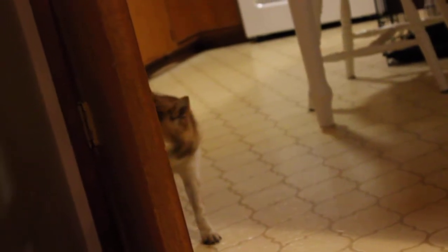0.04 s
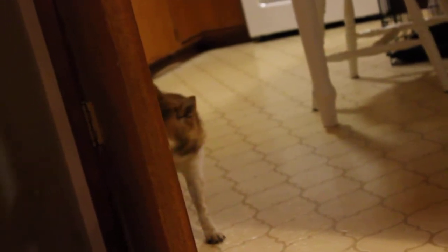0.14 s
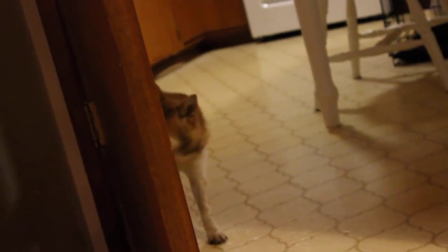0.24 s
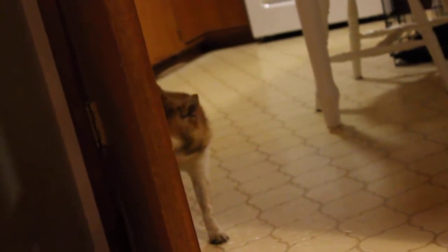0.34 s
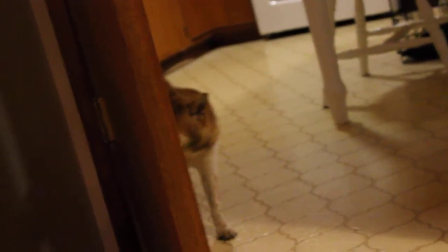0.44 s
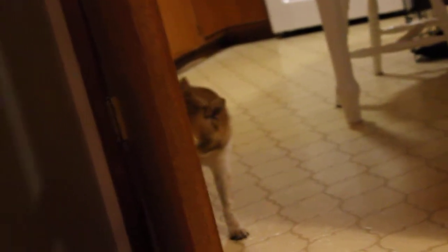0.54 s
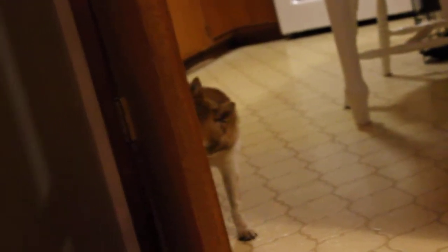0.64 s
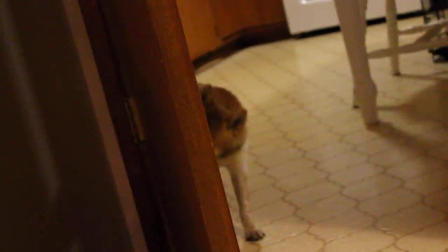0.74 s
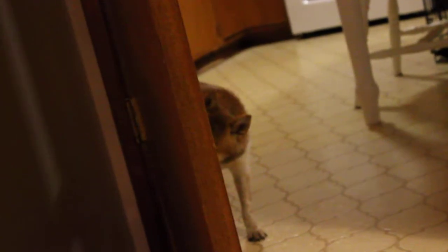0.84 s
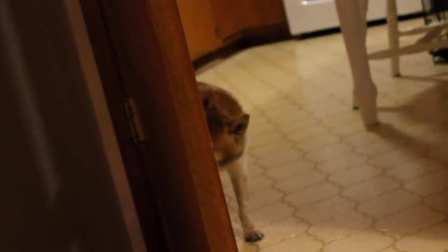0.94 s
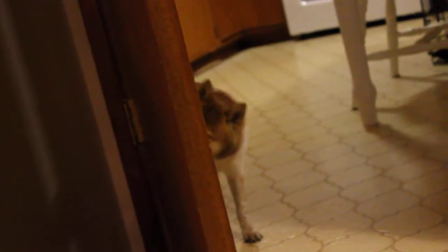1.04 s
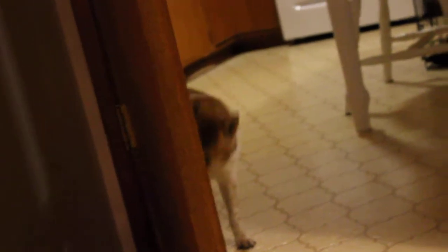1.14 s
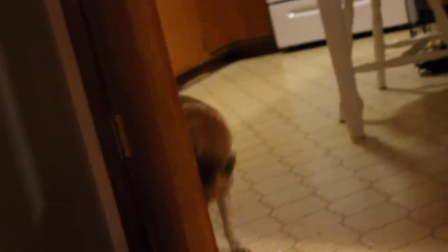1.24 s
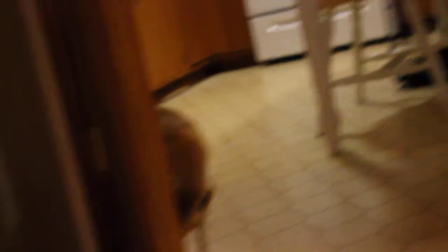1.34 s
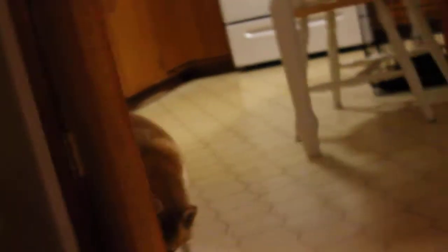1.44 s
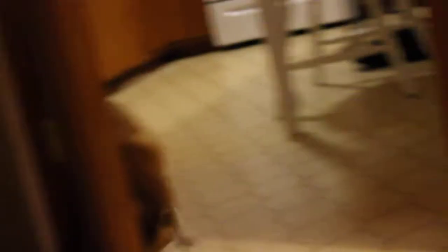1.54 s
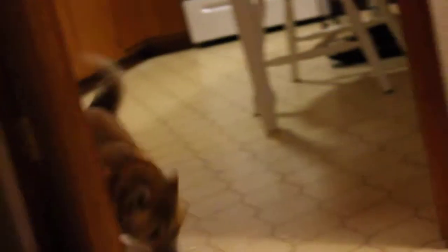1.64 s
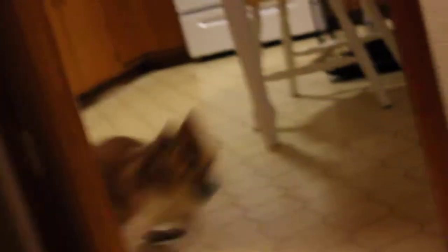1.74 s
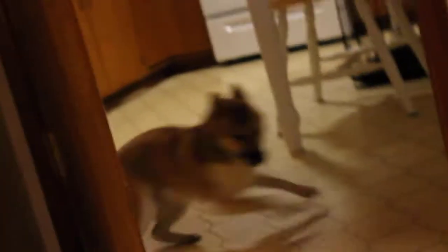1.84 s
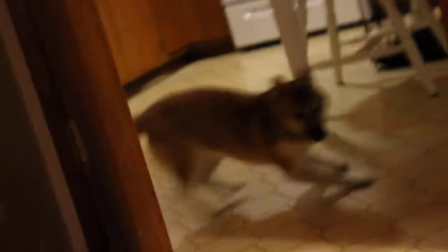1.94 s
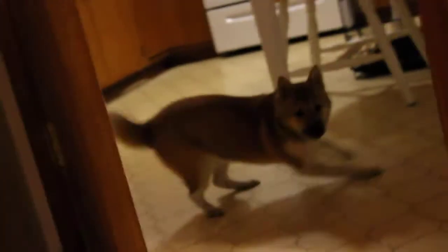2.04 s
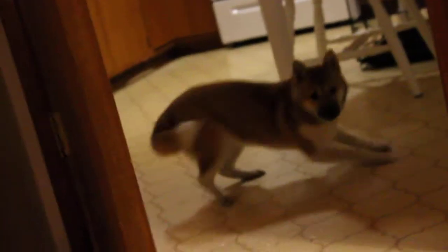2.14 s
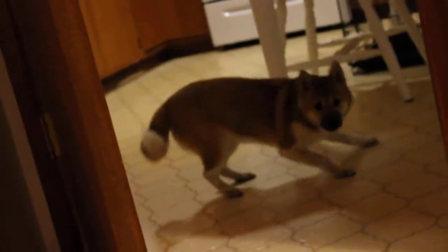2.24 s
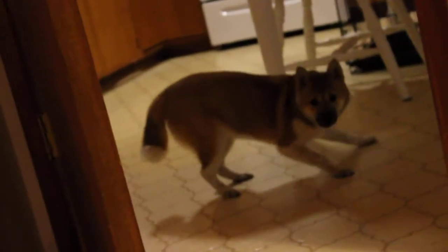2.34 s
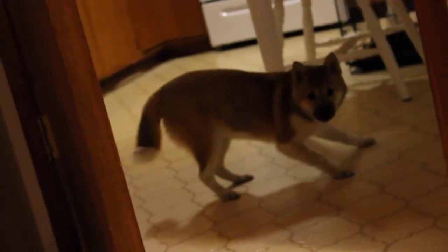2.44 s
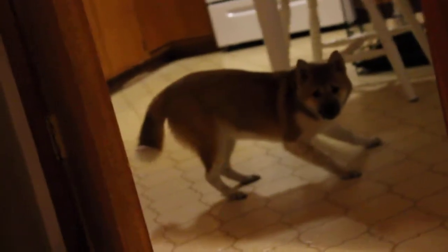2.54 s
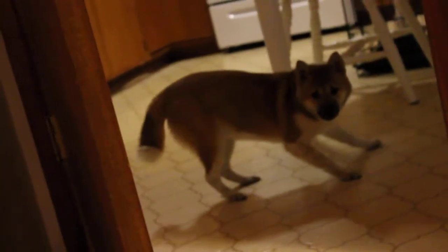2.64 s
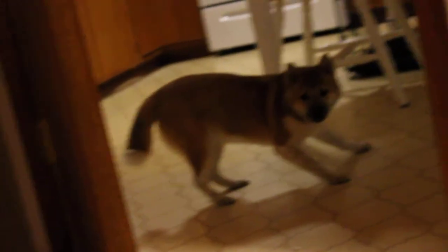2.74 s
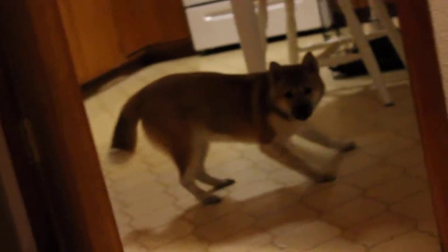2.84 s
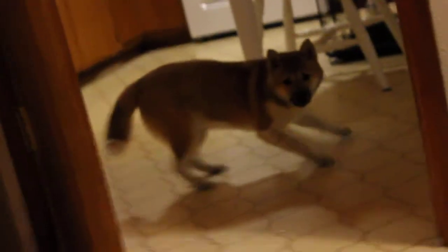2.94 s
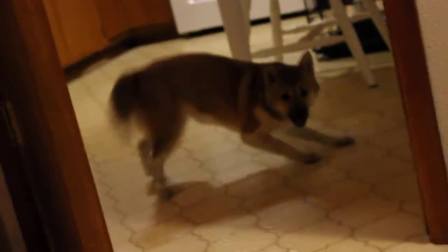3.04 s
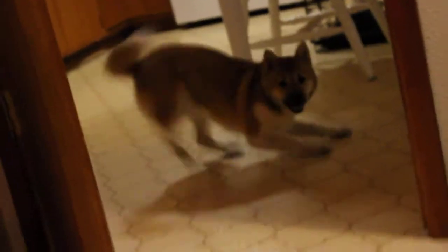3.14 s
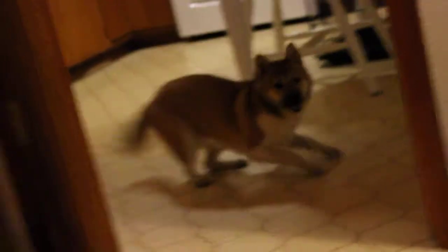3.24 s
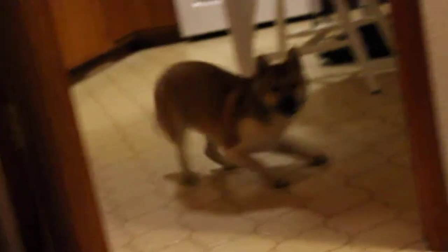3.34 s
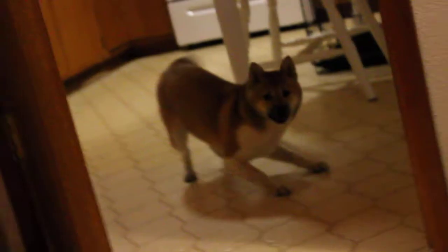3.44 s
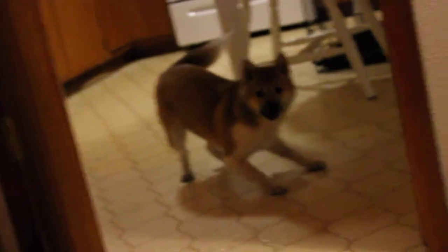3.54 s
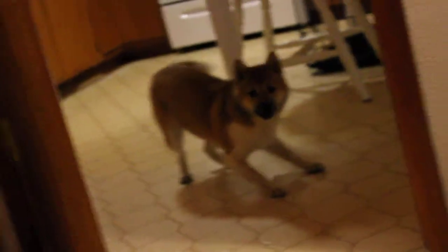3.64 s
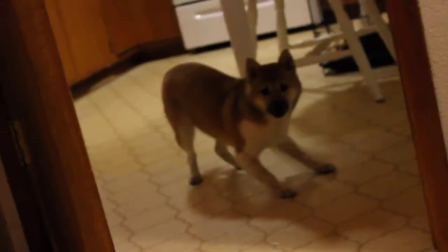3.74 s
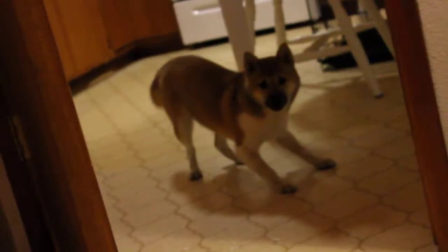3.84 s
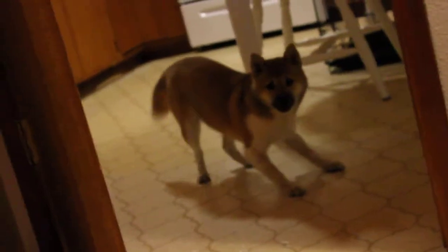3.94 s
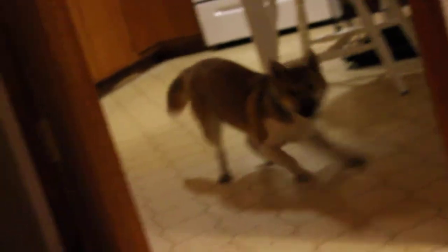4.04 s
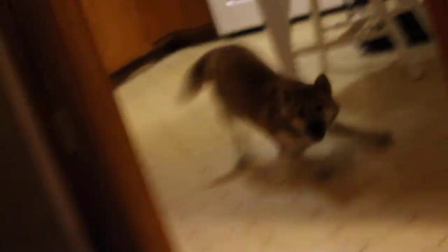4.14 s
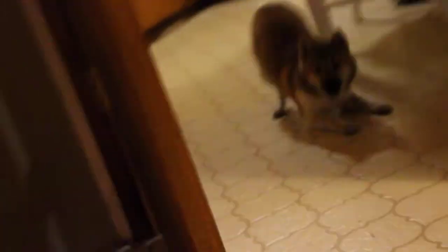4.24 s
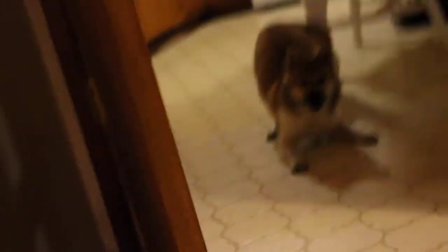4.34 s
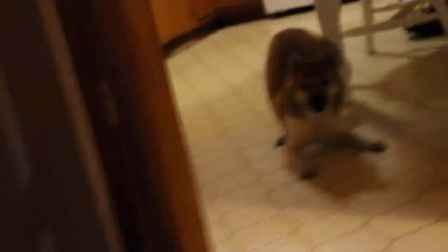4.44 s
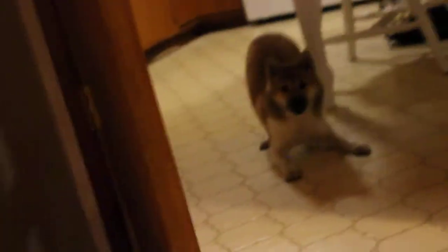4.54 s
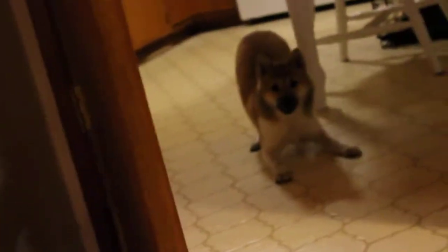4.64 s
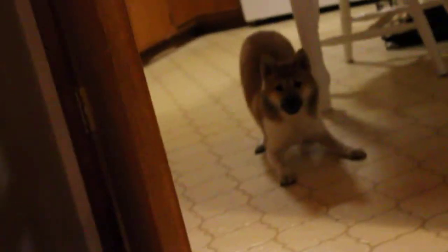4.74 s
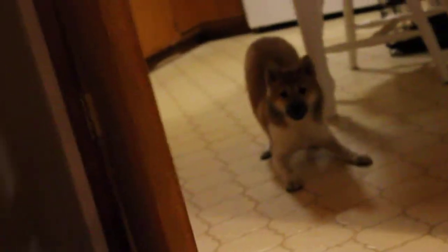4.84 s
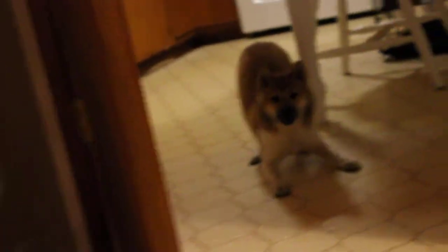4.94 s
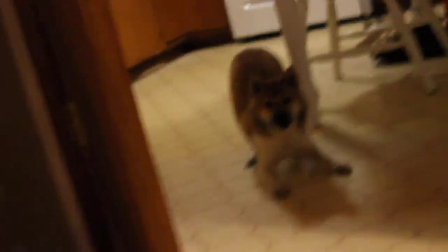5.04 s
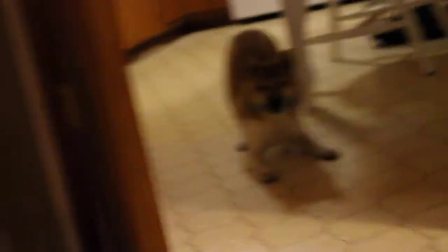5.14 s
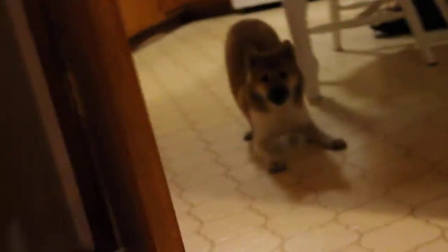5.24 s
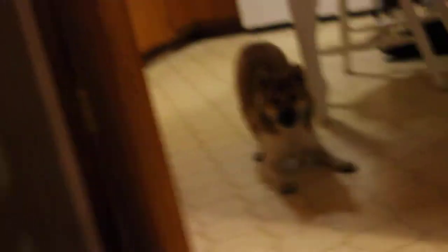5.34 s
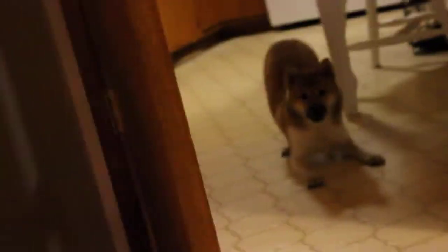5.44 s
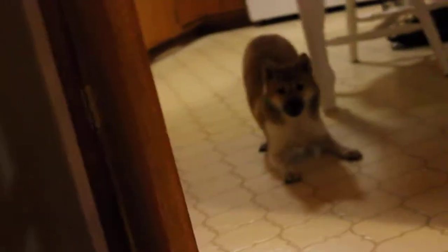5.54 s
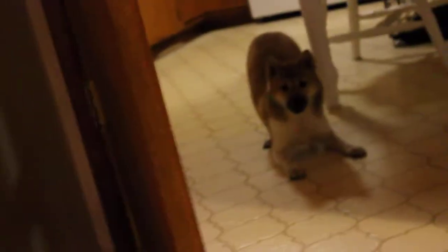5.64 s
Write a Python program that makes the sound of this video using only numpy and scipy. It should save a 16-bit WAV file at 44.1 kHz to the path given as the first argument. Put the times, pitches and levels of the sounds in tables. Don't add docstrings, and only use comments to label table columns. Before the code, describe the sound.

A small dog's claws click and scrabble in sudden bursts on a hard kitchen floor, with skids, soft thumps and a brief metallic rattle.

```python
import sys
import numpy as np
from scipy import signal
from scipy.fft import rfft, irfft, next_fast_len
from scipy.io import wavfile
from scipy.ndimage import uniform_filter1d, map_coordinates

SR = 44100
rng = np.random.default_rng(int(sys.argv[2]) if len(sys.argv) > 2 else 0)


def voltage_ratio(level):
    return 10 ** (np.asarray(level, float) / 20)


def transcribe(signal):
    frames = np.atleast_2d(signal).T
    limited = np.clip(frames, -1, 1)
    pcm = np.round(limited * 32767).astype(np.int16)
    wavfile.write(sys.argv[1], SR, pcm)


N = 250467


def claws():
    life_cycles, edge_ms = 0.56, 0.4
    low_hz, edge_hz, dull_hz = 1700, 7000, 11000
    s, db, hz, tip_db = nails()[:, :, None]
    length = 90
    t = np.arange(length) / SR

    life = life_cycles * np.exp(0.092 * rng.standard_normal((len(s), 1))) / hz
    snap = np.sin(2 * np.pi * hz * t) * (1 - np.exp(-t / life / 0.26)) * np.exp(-t / life)
    snap = voltage_ratio(db) * snap / np.abs(snap).max(axis=1, keepdims=True)

    spit = rng.standard_normal((len(s), length)) * np.exp(-t * 1000 / edge_ms)
    spit = voltage_ratio(db + tip_db + 11) * spit / np.linalg.norm(spit, axis=1, keepdims=True)

    first = np.round((s - 0.4 / hz) * SR).astype(int)
    place = (first + np.arange(length)).ravel()
    snaps = np.bincount(place, snap.ravel(), N + SR)[:N]
    spits = np.bincount(place, spit.ravel(), N + SR)[:N]

    def edge_response(f):
        bright = (1j * f / (edge_hz + 1j * f) / (1 + 1j * f / 11000)) ** 3
        return bright / (1 + 1j * f / dull_hz / 0.7 - (f / dull_hz) ** 2)

    def radiation(f):
        return (1j * f / (low_hz + 1j * f)) ** 3 / (1 + 1j * f / 11000) ** 2

    edge = voltage_ratio(11) * filtered(spits, edge_response)
    return voltage_ratio(2.5) * filtered(snaps + edge, radiation)


def nails():
    # time in seconds, peak in dB, pitch in Hz, number of clicks,
    # gap in ms.
    clusters = [
        (0.0911, -40.5, 6500, 3, 1.1),
        (0.4985, -45, 9000, 3, 1.3),
        (1.0602, -43, 10300, 2, .5),
        (1.3722, -42, 5500, 2, 1),
        (1.4065, -40, 4380, 2, 1.2),
        (1.8445, -28, 5200, 5, 1.7),
        (5.468, -40, 6500, 2, 0.37),
    ]
    # time in seconds, peak in dB, pitch in Hz.
    touches = [(0.191, -43, 10300), (0.785, -52, 3500), (1.646, -11, 2470), (1.668, -14, 3300),
               (1.672, -27, 2400), (1.75, -16, 4600), (1.8508, -20, 5610), (2.2716, -24, 4600),
               (3.0186, -29, 3590), (3.1677, -26, 4000), (4.0189, -44, 3430), (4.0349, -43, 2520),
               (4.0765, -36, 4200), (4.1199, -4.5, 2430), (4.1276, -10, 4400), (4.138, -18.5, 3900),
               (4.55, -40, 2660), (4.9058, -44.5, 2840), (5.1335, -35, 2020), (5.1471, -32, 2270),
               (5.521, -52, 2760), (5.6403, -45, 2480)]
    # time in seconds, peak in dB,
    # pitch in Hz, edge in dB.
    taps = [(1.3738, -28.5, 4980, -23), (1.4093, -30, 4280, -27), (1.5996, -20, 3060, -30),
            (1.6168, -14, 6150, -12), (1.6176, -21, 3940, -13), (1.637, -4, 4200, -18),
            (1.6383, -4, 2380, -22), (1.6389, -2, 4260, -12), (1.6398, -11, 4100, -20),
            (1.6404, -5, 4330, -25), (1.6484, -12, 3030, -26), (1.6568, -5.5, 3620, -15),
            (1.6811, -14, 4720, -19), (1.682, -18, 4870, -20), (1.6938, -10, 3600, -24),
            (1.696, -10, 3780, -22), (1.726, -20, 3640, -14), (1.7311, -23, 4460, -24),
            (1.7427, -11.5, 4270, -16), (1.7442, -9, 3880, -14), (1.7609, -17, 3640, -15),
            (1.7662, -22, 4310, -30), (1.9279, -2, 3470, -14), (1.9293, -13, 4490, -16),
            (1.9353, -13, 3760, -25), (1.9467, -3, 3640, -10), (1.948, -18, 3660, -16),
            (1.9489, -9, 4330, -14), (1.9534, -11.5, 4370, -16), (1.9602, -9, 4970, -15),
            (2.0297, -11, 5540, -5), (2.0303, -24, 4460, -15), (2.0313, -10, 5650, -20),
            (2.0357, -15, 5700, -13), (2.0651, -20, 6470, -11), (2.1413, -6.5, 4080, -19),
            (2.1425, -7, 3880, -16), (2.1439, -16.5, 3400, -8), (2.1507, -15.5, 3680, -17),
            (2.2398, -18, 4500, -20), (2.2406, -13, 4400, -28), (2.2434, -9, 5800, -20),
            (2.2442, -32, 6200, -18), (2.2467, -16, 6890, -20), (2.2567, -13.5, 4600, -18),
            (2.2605, -15, 4850, -18), (2.2634, -12, 6300, -16), (3.0113, -30, 3140, -23),
            (3.0156, -30, 3720, -17), (3.0259, -19, 3660, -18)]
    # time in seconds, peak in dB, pitch in Hz, edge in dB.
    later_taps = [(3.0278, -13.5, 6530, -20), (3.0357, -29, 6000, -23), (3.0434, -29, 4450, -18),
                  (3.0517, -17, 3290, -25), (3.054, -21, 3130, -27), (3.0648, -19, 3440, -19),
                  (3.0683, 1.5, 4080, -10), (3.069, -10.5, 4090, 1), (3.0706, -9, 6250, 8),
                  (3.0785, -13, 3990, -12), (3.0822, -26, 4560, -14), (3.1066, -18, 3710, -22),
                  (3.1073, -9, 3360, -18), (3.1259, -14.5, 3300, -24), (3.2067, -21, 4670, -17),
                  (3.2096, -23, 4700, -15), (3.2172, -2, 4400, -18), (3.2187, -3, 4700, -10),
                  (3.2201, -0.5, 5400, -18), (3.2267, -12, 6370, -20), (3.2341, -21, 5640, -23),
                  (3.2349, -10, 5690, -18), (3.261, -26, 4070, -24), (3.2952, -5, 3400, -4),
                  (3.2977, -7, 3640, -12), (3.2989, -21, 3640, -22), (3.3396, -14, 3640, -12),
                  (3.3415, -9.5, 3500, -5), (3.3429, -8.5, 3180, -12), (3.3475, -14, 6520, -15),
                  (3.3932, -21, 3370, -11), (3.3994, -20, 4740, -15), (4.0703, -30, 5290, -14),
                  (4.0945, -22, 3490, -22), (4.1191, 2, 3900, -12), (4.121, -1.5, 3430, -26),
                  (4.1218, -17, 3150, -26), (4.129, -14, 3700, -14), (4.1953, -23, 4020, -23),
                  (4.1981, -15, 4830, -19), (4.2426, -18, 4750, -18), (4.2432, -15, 3530, -12),
                  (4.2475, -19, 4280, -23), (4.2485, -14, 4380, -17), (4.3212, -19.5, 4460, -23),
                  (4.3229, -24, 3400, -14), (4.3351, -19, 3680, -20), (4.3573, -22, 4060, -18),
                  (5.0945, -33, 4000, -23), (5.1021, -34, 3800, -24)]
    loss_db, inner_nail_db, pitch_spread = 1.3, 4, 0.12

    rows = list(touches)
    for s, db, hz, many, gap_ms in clusters:
        for k in range(min(round(many), 6)):
            gap_luck, pitch_luck = rng.standard_normal(2)
            start = s + k * gap_ms / 1000 * (1 + 0.074 * gap_luck)
            peak_db = db - loss_db * k - inner_nail_db * (k % 2)
            rows.append((start, peak_db, hz * np.exp(pitch_spread * pitch_luck)))
    s, db, hz = np.transpose(rows)
    tip_db = -7 + 10 * np.log2(hz / 4000) + 2.5 * rng.standard_normal(len(s))
    unlisted = [s, db, hz, np.minimum(tip_db, -4)]
    return np.hstack([unlisted, np.transpose(list(taps) + list(later_taps))])


def pings():
    # time in seconds, peak in dB, pitch in Hz, t60 in ms.
    notes_left = [(0.0911, -56, 6000, 8), (0.191, -55, 10400, 10), (0.4985, -54, 10300, 10),
                  (0.499, -55, 6350, 10), (0.499, -58, 8100, 8), (1.0602, -55, 10300, 10),
                  (1.6168, -28, 6700, 12), (1.6811, -19, 4960, 15), (1.7495, -20, 1500, 13),
                  (3.0706, -13, 7900, 5), (3.2349, -30, 6240, 10), (4.1192, -12, 7230, 5.4),
                  (4.1195, -17, 8900, 5.4), (4.138, -14, 4520, 19), (3.2955, -15, 2390, 21),
                  (2.1415, -22.5, 2700, 11), (4.1445, -17, 2460, 16), (5.468, -52, 7200, 10)]
    out, t = np.zeros(N + SR), np.arange(SR // 20) / SR
    for s, db, hz, t60_ms in notes_left:
        decay = voltage_ratio(db - 60 * t * 1000 / t60_ms)
        out[round(s * SR):][:len(t)] += decay * np.sin(2 * np.pi * hz * t) * (1 - np.exp(-t * hz))
    return out[:N]


def skids():
    # time of most force in seconds, scratch in dB, time to fade 20 dB in ms,
    # pad drag in dB against the scratch.
    slides = [
        [(1.374, -43.5, 21, -8), (1.408, -45.5, 19, -4), (1.497, -38, 50, 9), (1.527, -43, 13, -11),
         (1.536, -25.5, 29, -16), (1.55, -32, 50, -8), (1.578, -33, 70, -1.5), (1.621, -27, 11, -2),
         (1.642, -33, 12, 15), (1.657, -23.5, 100, -9), (1.748, -24.5, 29, -2), (1.785, -34.5, 118, -21),
         (1.843, -40, 10, -18), (1.848, -26.5, 25, -19), (1.96, -28, 84, -14), (2.04, -27, 50, -19.5),
         (2.17, -38, 210, -17.5), (2.212, -34, 17, -17), (2.26, -31, 41, -15)],
    ]
    later_slides = [
        [(2.953, -57, 16, 12), (2.965, -52, 61, 6.5), (2.984, -40.5, 37, -16), (3.022, -33, 61, -6),
         (3.055, -35.5, 100, -0.5), (3.08, -22, 69, -14.5), (3.16, -37.5, 280, -13), (3.24, -29.5, 71, -27),
         (3.3, -28, 17, -9), (3.35, -32.5, 140, -13), (3.405, -33, 115, -30)],
        [(4.058, -59, 55, -2), (4.078, -39.5, 62, -3.5), (4.112, -30.5, 42, 9), (4.142, -24.5, 27, -26),
         (4.185, -28.5, 170, -12), (4.255, -28.5, 34, -20), (4.335, -32, 74, -10.5)],
        [(5.085, -51.5, 60, -5), (5.1, -48, 46, -12), (5.135, -48, 14, 9), (5.15, -51.5, 57, 7),
         (5.21, -50, 50, -6), (5.225, -41, 72, -6), (5.3, -52, 120, 2), (5.25, -39.5, 73, -7.5),
         (5.345, -58.5, 110, 4.5), (5.4, -55, 140, 4.5)],
    ]
    # time in seconds, level in dB, time to fade 20 dB in ms.
    brakes = [
        (1.2, -66, 200),
        (4.122, -20.5, 12),
        (1.655, -28, 47),
        (1.752, -46, 33),
        (3.299, -32.5, 36),
        (4.142, -32, 60),
        (5.136, -56, 38),
    ]
    # frequency in Hz, level in dB.
    scratch_colour = [(900, -7), (1800, -3), (3000, 7.5), (4500, 5.5), (7000, 2), (9500, -7),
                      (12000, -20.5), (16000, -29)]
    # frequency in Hz, level in dB.
    drag_colour = [(200, -25), (400, -3), (750, -4), (1100, 0), (1600, 0), (2300, -8), (4000, -35)]
    # frequency in Hz, level in dB.
    rasp_colour = [(1100, -35), (1600, -3.5), (2250, -1), (2700, 0.5), (3300, -33)]

    scratch = coloured(patchy(gritty(3.5, 2200), 3.5), scratch_colour)
    drag = coloured(gritty(2.5, 300), drag_colour)
    nail_gain, pad_gain = pairs(sum(slides + later_slides, []), rise=0.46)
    rasp = strokes(brakes, rise=0.47) * coloured(gritty(4.1, 600), rasp_colour)
    return voltage_ratio(-5.0) * nail_gain * scratch + voltage_ratio(-5.5) * pad_gain * drag + rasp


def swishes():
    # time in seconds, level in dB, time to fade 20 dB in ms.
    flat_slides = [(1.535, -45, 40), (1.57, -49, 80), (1.625, -41, 25), (1.762, -46, 20), (1.79, -60, 90),
                   (1.852, -43, 25), (3.11, -51, 58), (3.3, -41, 40), (3.405, -42.5, 52), (2.048, -44, 10),
                   (4.198, -49, 6), (4.25, -41, 31)]
    # frequency in Hz, level in dB.
    swish_colour = [(5000, -30), (7500, 6), (9500, 0), (12000, -8), (14000, -12), (16000, -18)]
    return strokes(flat_slides, rise=0.36) * coloured(gritty(2.5, 1500), swish_colour)


def thumps():
    # time in seconds, peak in dB, deep joist level in dB,
    # softness in ms, board pitch in semitones (set by the spot).
    weight_shifts = [(0.274, -49.5, -45, 3, 1), (1.483, -19.5, -8, 4.7, 0.5), (1.4962, -14, -26, 2.7, 1),
                     (1.52, -23.5, -16, 5.4, -3.5), (1.55, -31, -26, 3.5, -1), (1.617, -29.5, -13.5, 2.7, 7),
                     (1.648, -35, -25, 3, -8), (1.706, -33, -16, 2, -1.5), (1.752, -29, -24, 1.4, 0),
                     (1.927, -42.5, -26, 0.64, 0), (2.057, -35.5, -17, 4.1, -5.5), (2.147, -41, -27, 2.5, 1),
                     (2.258, -36.5, -22, 3, -2), (2.951, -49.5, -17, 0.82, 4), (3.001, -47, -34, 1.1, 0.5),
                     (3.071, -19.5, -31, 2.6, 2), (3.218, -19.5, -31, 3.4, -1.5), (3.095, -27.5, -30, 2.3, 6),
                     (3.24, -25.5, -34, 2.3, 1.5), (3.299, -34.5, -42, 1.4, 1.5), (3.346, -44, -28, 1.7, 0),
                     (4.059, -45, -22.5, 1.1, 7), (4.092, -9.5, -19.5, 4.6, 3), (4.1034, -10.5, -33, 1.95, 1),
                     (4.127, -18.5, -23, 3.4, -0.5), (4.15, -24, -30, 4.3, -0.5), (4.173, -27.5, -27, 5.1, 0.5),
                     (4.237, -33.5, -11, 7.1, -4.5), (4.29, -45, -25, 3, 0), (4.36, -43.5, -24, 2, 2.5),
                     (4.901, -55, -25, 8.2, 1), (5.133, -48, -27, 2.3, 2), (5.145, -33, -10.5, 1.6, 1),
                     (5.18, -37.5, -8.5, 3.2, -2), (5.339, -45.5, -5, 4, -3),
                     (1.8, -47, -8, 5.6, -2),
        (5.214, -43, -22, 1.9, -2.5),
        (5.385, -44.5, -18, 2.9, 8),
        (5.435, -46.5, -15, 3.8, -1.5),
        (5.56, -59, -7, 6.9, -1),
    ]
    # frequency in Hz, width in Hz, level in dB.
    boards = [(132, 14.8, -0.5), (198, 19.5, -3.5), (271, 49, -7.5), (396, 57, -10.5), (584, 310, -14.5),
              (883, 36, -3.5), (1295, 650, -13.5)]
    # frequency in Hz, width in Hz, level in dB.
    joists = [(50, 55, 6.5), (84.4, 12, 12), (100, 26, -5.5)]

    out, size = np.zeros(N + SR), 16384
    hz = np.fft.rfftfreq(size, 1 / SR)
    board_response, joist_response = body(boards), body(joists)
    for s, db, deep_db, soft_ms, semitones in weight_shifts:
        push = 1 / (1 + 2j * np.pi * hz * np.clip(soft_ms, 0.5, 9) / 6000) ** 3
        ring = board_response(hz / 2 ** (semitones / 12)) + voltage_ratio(deep_db + 2) * joist_response(hz)
        out[round(s * SR):][:size] += voltage_ratio(db + 51.5) * irfft(push * ring, size)
    return out[:N]


def fitting():
    # time in seconds, level in dB, time to fade 20 dB in ms.
    shakes = [
        (1.532, -35, 53),
        (1.565, -37.5, 70),
        (1.62, -31, 29),
        (5.207, -47, 40),
        (5.228, -43, 40),
        (5.247, -46.5, 94),
        (5.28, -47.5, 86),
        (5.32, -56, 122),
        (5.39, -50.5, 54),
    ]
    # frequency in Hz, width in Hz, level in dB.
    metal = [(942, 49, 1), (1500, 200, -1), (2610, 240, 2.5), (3060, 86, 1), (4030, 140, -0.5),
             (4490, 47, 2.5), (5260, 35, 4.5), (5770, 90, -21), (6250, 110, -22), (7200, 90, -11),
             (9000, 66, -22), (10400, 90, -24), (11300, 120, -27)]
    return strokes(shakes, rise=0.49) * unit(filtered(gritty(2.5, 400), body(metal)))


def kitchen(x, wet_db, count=40):
    # frequency in Hz, t60 in seconds.
    decay_times = [(60, 0.18), (250, 0.34), (700, 0.23), (1800, 0.32), (5000, 0.34), (9000, 0.26),
                   (14000, 0.26)]
    # frequency in Hz, level in dB.
    echo_colour = [(60, 13.5), (400, 9), (1200, 1.5), (3000, -2.5), (7000, -3), (9500, 1.5), (11000, -1),
                   (13000, -1.5), (16000, -2)]
    out, size = np.zeros(N + 2 * SR), N // count + 1
    for k in range(count):
        hz, t, z = signal.stft(rng.standard_normal(SR * 3 // 4), SR, nperseg=256)
        decay_db = along(echo_colour, hz)[:, None] - 60 * t / along(decay_times, hz)[:, None]
        tail = signal.istft(z * voltage_ratio(decay_db), SR, nperseg=256)[1]
        after = np.arange(len(tail)) / SR
        tail = tail * (1 - 0.75 * np.exp(-after / 0.005))
        answer = signal.fftconvolve(x[k * size:(k + 1) * size], tail / np.linalg.norm(tail))
        out[k * size:][:len(answer)] += answer
    return voltage_ratio(wet_db) * out[:N]


def house():
    # time in seconds, rustle in dB, time to fade 20 dB in ms,
    # murmur in dB against the rustle.
    stirs = [(0.01, -66, 300, -22), (0.13, -70, 200, 4), (0.3, -73, 400, 8), (0.42, -73, 150, 7),
             (0.5, -60, 16, -21), (0.73, -59.5, 250, -30), (0.79, -64, 80, -20), (0.976, -57.5, 104, -19),
             (1.14, -57, 200, -40), (1.19, -58.5, 300, -40), (1.33, -63.5, 500, -7.5),
             (2.45, -60.5, 328, 3), (2.6, -70, 90, 7), (2.8, -68, 400, 0), (2.92, -62, 400, -4),
             (3.58, -61.5, 400, -2.5), (3.712, -60.5, 496, 2), (3.94, -61, 500, -10),
             (4.42, -68.5, 150, 16), (4.48, -63, 252, -1), (4.64, -75.5, 150, 15), (4.668, -59.5, 123, -28),
             (5.03, -62, 400, -3), (5.52, -64.5, 151, -5), (5.66, -66, 196, -1)]
    # frequency in Hz, level in dB.
    murmur_colour = [(15, -54), (25, -14), (139, -8.5), (166, -7.5), (253, 2), (328, -10), (405, -12.5),
                     (1200, -17.5), (1560, -68), (2640, -120)]
    # frequency in Hz, level in dB.
    traffic_colour = [(20, -33), (40, -38), (90, -5.5), (200, -6.5), (400, -12), (800, -26)]
    # frequency in Hz, level in dB.
    rustle_colour = [(500, -15), (1000, 0), (2000, -1), (4000, -3.5), (8000, -12.5), (12000, -24)]

    rustle_gain, swell = pairs(stirs, rise=0.47)
    murmur_gain = np.hypot(swell, voltage_ratio(-73)) * voltage_ratio(wobble(23.0))
    murmur = murmur_gain * coloured(rng.standard_normal(N), murmur_colour)
    traffic = voltage_ratio(-70) * coloured(rng.standard_normal(N), traffic_colour)
    rustle = rustle_gain * voltage_ratio(-0.5 + wobble(3.72)) * coloured(gritty(1.84, 400), rustle_colour)
    return murmur + traffic + rustle


def strokes(rows, rise):
    power, t = np.zeros(N), np.arange(N) / SR
    for s, db, fade_ms in rows:
        fade = max(fade_ms, 3) / 1000
        near = slice(max(0, int((s - 3 * fade) * SR)), int((s + 3 * fade) * SR))
        away = np.maximum(t[near] - s, (s - t[near]) / np.clip(rise, 0.05, 1))
        power[near] += voltage_ratio(db - 20 * away / fade) ** 2
    return np.sqrt(power)


def pairs(rows, rise):
    first = [row[:3] for row in rows]
    second = [(s, db + relative_db, ms) for s, db, ms, relative_db in rows]
    return strokes(first, rise), strokes(second, rise)


def gritty(spread_db, rate):
    return rng.standard_normal(N) * voltage_ratio(spread_db * np.minimum(wobble(rate), 2.4))


def patchy(x, patch_db):
    z = signal.stft(x, nperseg=128)[2]
    field = uniform_filter1d(rng.standard_normal(z.shape), size=3, axis=0)
    field = uniform_filter1d(field, size=4, axis=1)
    return signal.istft(z * voltage_ratio(patch_db * unit(field)), nperseg=128)[1][:N]


def wobble(rate):
    knots = rng.standard_normal(int(N * rate / SR) + 4)
    return map_coordinates(knots, [np.arange(N) * rate / SR])


def body(modes):
    def response(f):
        total = 0
        for k, (centre, width, db) in enumerate(modes):
            damping = 1j * f * width
            total = total + (-1) ** k * voltage_ratio(db) * damping / (centre * centre - f * f + damping)
        return total
    return response


def filtered(x, response):
    m = next_fast_len(N + SR // 2)
    return irfft(rfft(x, m) * response(np.fft.rfftfreq(m, 1 / SR)), m)[:N]


def coloured(x, spectrum):
    return unit(filtered(x, lambda hz: voltage_ratio(along(spectrum, hz))))


def along(points, hz):
    f, v = np.transpose(points)
    return np.interp(np.log(hz + 1), np.log(f + 1), v)


def unit(x):
    return x / np.sqrt(np.mean(x ** 2) + 1e-20)


def scene():
    clicks = claws() + pings()
    slides = skids() + fitting()
    weight = thumps()
    room = kitchen(clicks, wet_db=-2.5) + kitchen(slides, wet_db=-3) + kitchen(weight, wet_db=-12.5)
    return (clicks + slides + weight + room + house() + swishes())[None]


def roll_off(x):
    return signal.sosfilt(signal.butter(12, 16820, fs=SR, output="sos"), x)


def record(dry):
    # frequency in Hz, level in dB.
    hiss_colour = [(180, -26), (300, 2.5), (577, 2), (1000, 0), (1310, -1), (1630, -1), (2170, -3.5),
                   (7760, -11.5), (15200, -23), (16500, -49)]
    # frequency in Hz, rms level in dB.
    tones = [(7881, -80), (10497, -88)]
    # frequency in Hz, level in dB.
    band_limit = [(15700, 0), (15900, -6), (16050, -30), (16780, -33), (16900, -90)]

    hiss = voltage_ratio(-61.5) * coloured(rng.standard_normal(N), hiss_colour)
    t = np.arange(N) / SR
    whine = sum(voltage_ratio(db - 1.5 + 3.5 * wobble(65)) * np.sin(2 * np.pi * hz * t) for hz, db in tones)
    heard = filtered(dry[0] + hiss + whine, lambda hz: (1j * hz / (42 + 1j * hz)) ** 2)
    heard = heard / (1 + np.abs(heard / 1.2) ** 4) ** (1 / 4)
    heard = filtered(heard, lambda hz: voltage_ratio(along(band_limit, hz)))
    return roll_off(heard[None])


dry = scene()
out = record(dry)
transcribe(out)
```